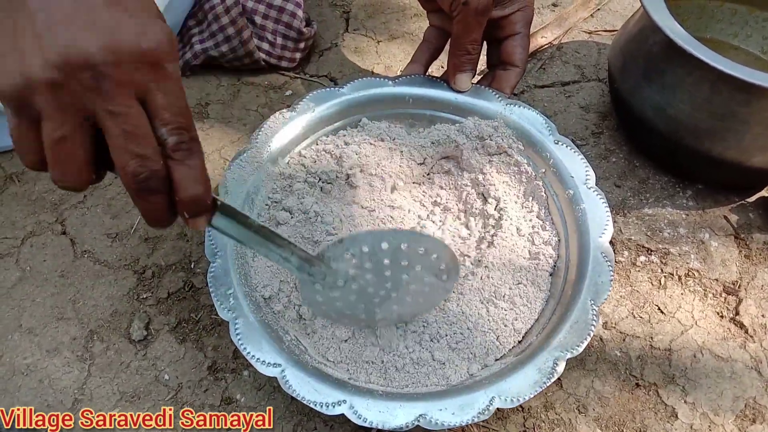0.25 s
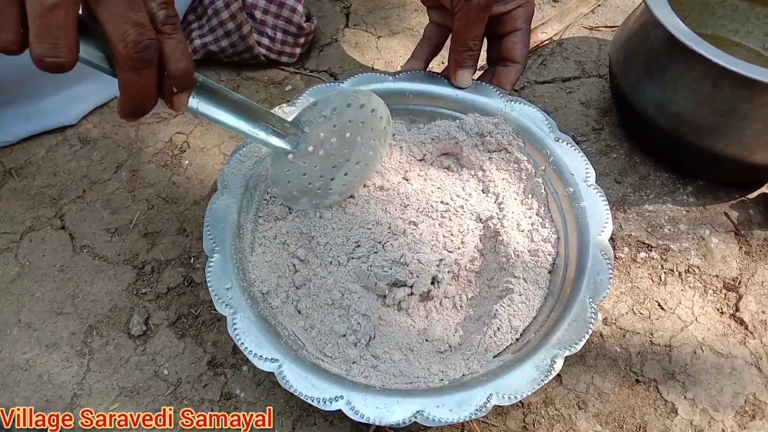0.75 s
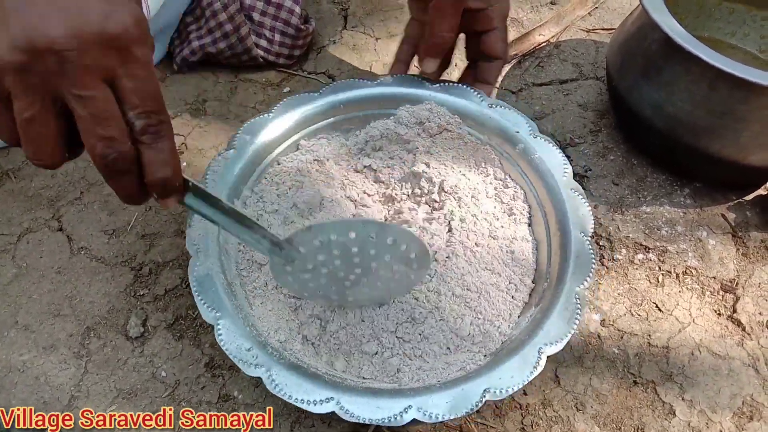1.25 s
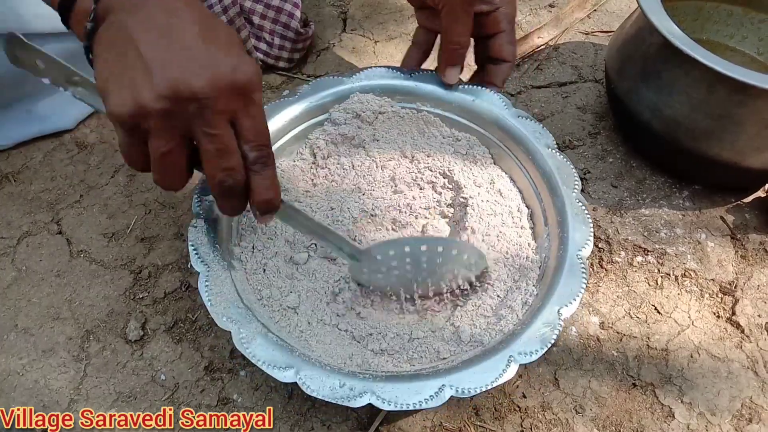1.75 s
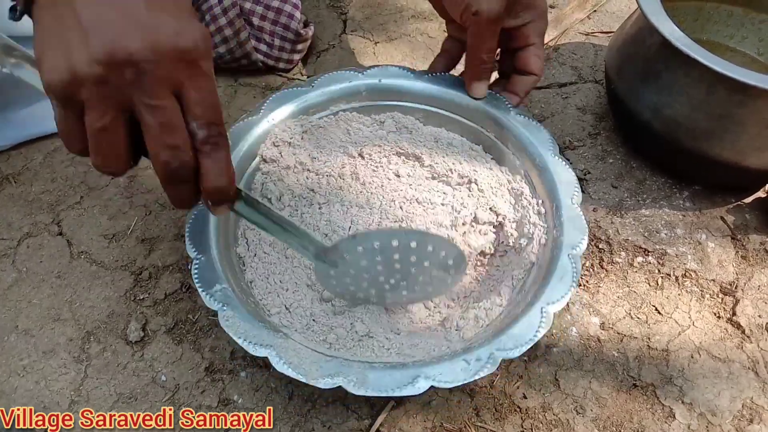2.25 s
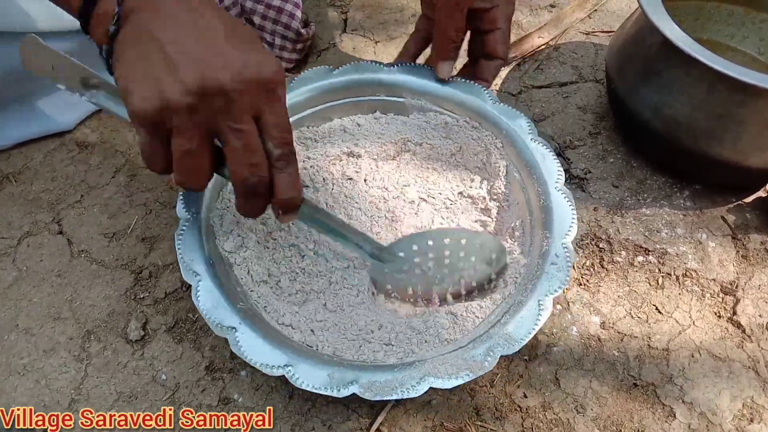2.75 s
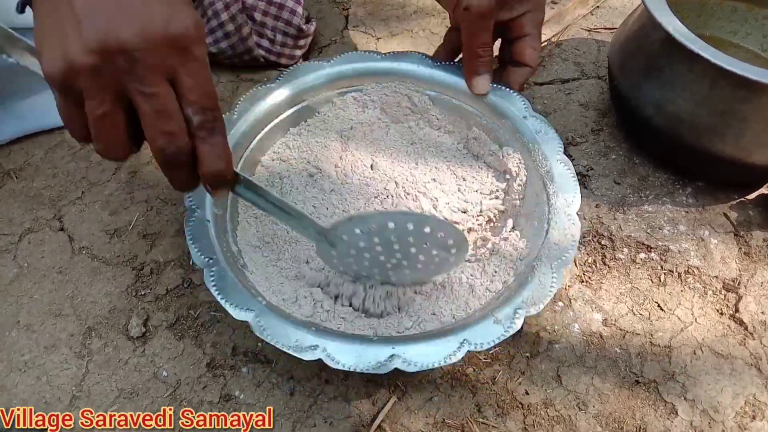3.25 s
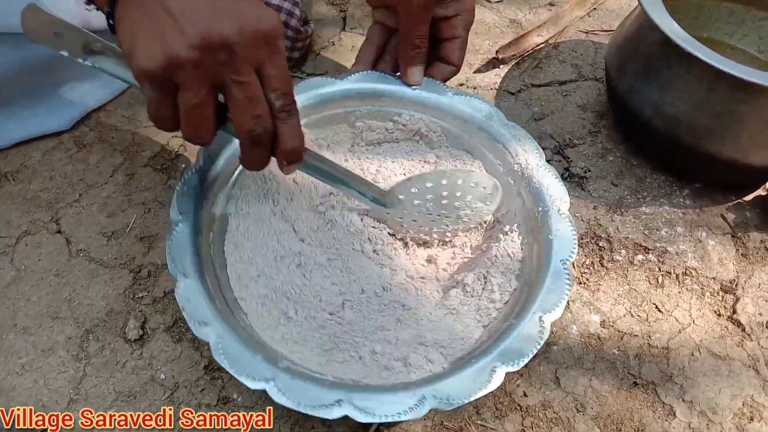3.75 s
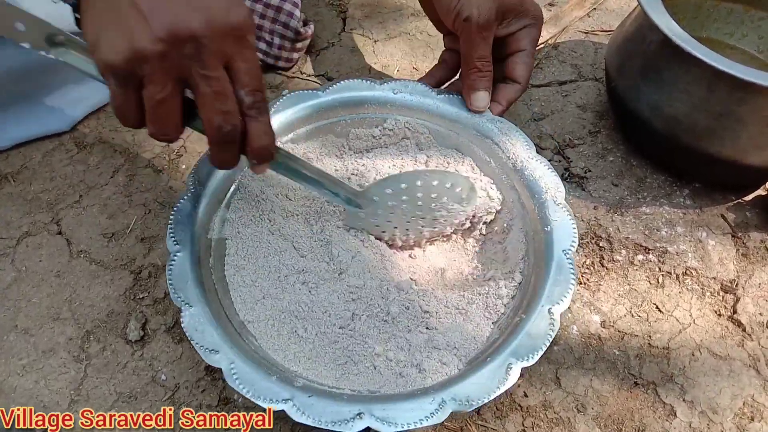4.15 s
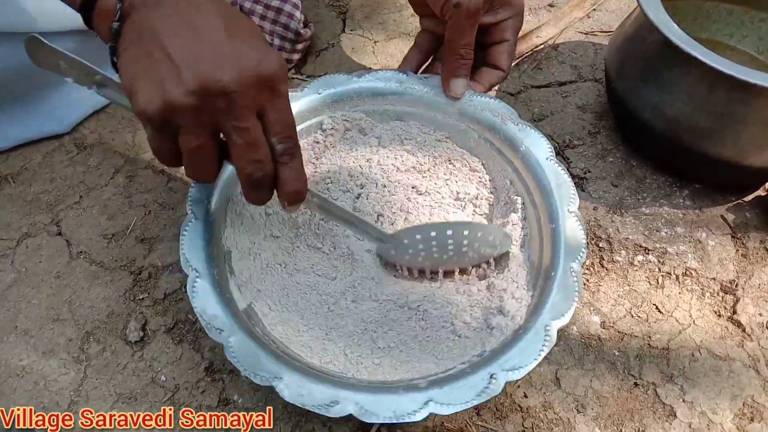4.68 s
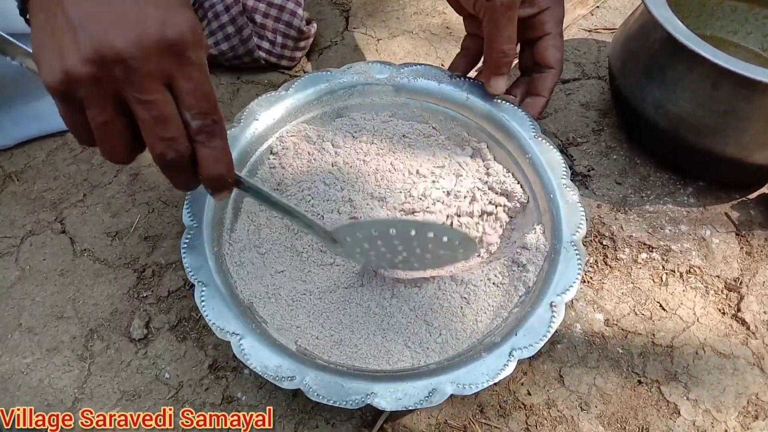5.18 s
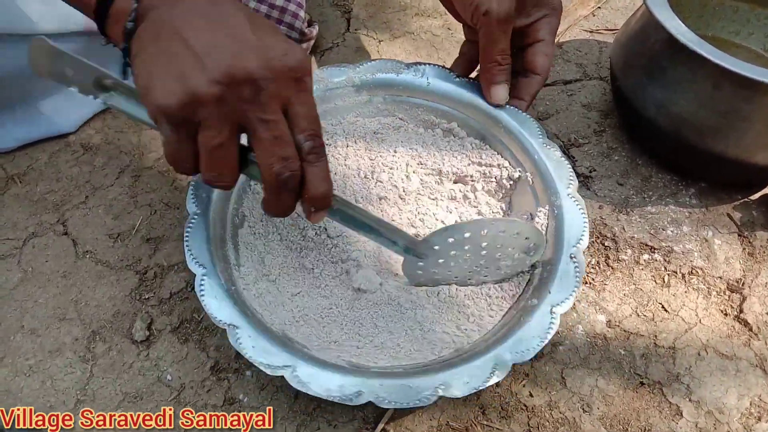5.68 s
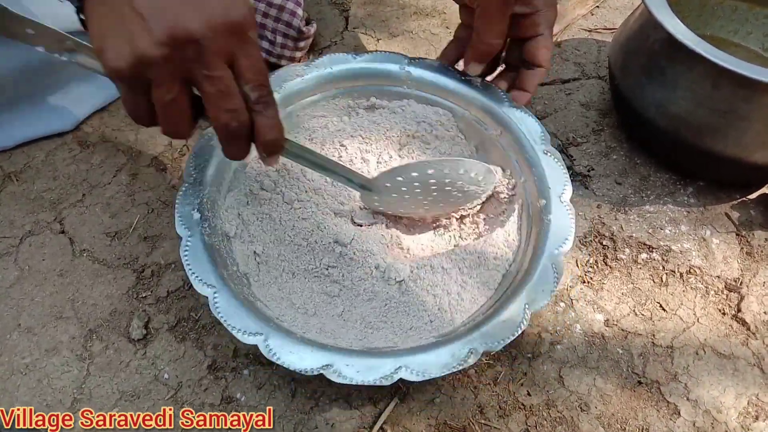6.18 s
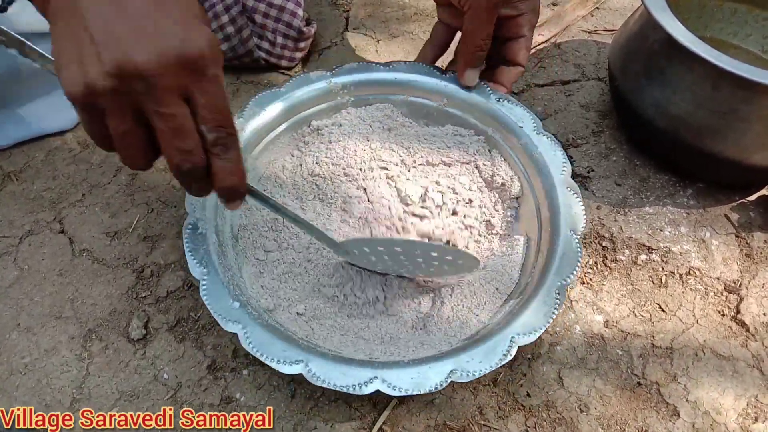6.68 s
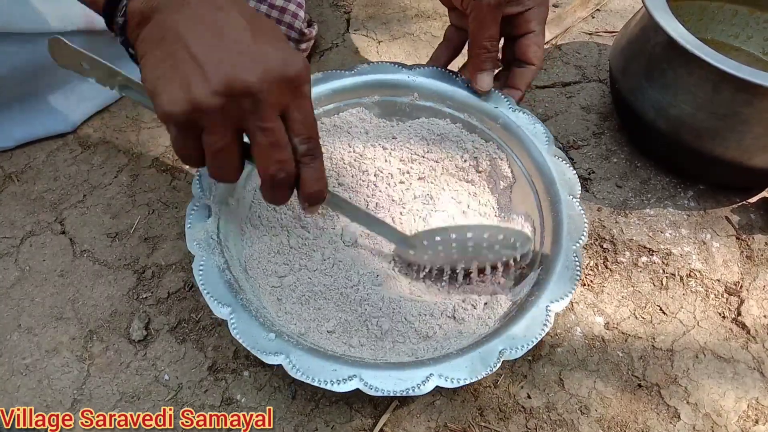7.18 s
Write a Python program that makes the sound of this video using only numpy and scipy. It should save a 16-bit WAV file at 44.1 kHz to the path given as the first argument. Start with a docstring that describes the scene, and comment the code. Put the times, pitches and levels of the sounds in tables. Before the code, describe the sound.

Outdoors on bare earth, a steel ladle stirs dry flour in a rocking metal plate: short gritty scrapes, muffled clinks and low thuds, irregular, several times a second in busy spots. Chicks peep shrilly without pause all around, each falling sharply in pitch with a short echo. A faint slow engine putters far away under murmuring air; a few soft bird whistles come late. One close microphone, identical in both channels.

```python
"""In a yard on bare earth, a perforated steel ladle stirs flour and grated coconut in a rocking steel plate.
The flour damps the metal: blows are short plate modes, sinking thuds and bright noise cracks,
and the scrapes between them are random grains, coloured as grit or ringing the plate.
Chicks peep all around as gliding sines that break and plunge, each with its own yard echo.
Farther off are a few whistling birds, a slow engine of filtered puffs, and murmuring open air."""
import sys
import numpy as np
from scipy import signal
from scipy.fft import rfft, irfft, next_fast_len
from scipy.io import wavfile
from scipy.ndimage import map_coordinates

SR = 44100
rng = np.random.default_rng(int(sys.argv[2]) if len(sys.argv) > 2 else 0)


def put_to_file(sound):
    """Save the sound as 16-bit audio at rate SR, in the file named by the first command-line argument."""
    columns = np.atleast_2d(sound).T  # one column per channel
    safe = np.clip(columns, -1, 1)
    whole_steps = np.round(safe * 32767)
    wavfile.write(sys.argv[1], SR, whole_steps.astype(np.int16))


N = 327221
TIME = np.arange(N) / SR


def amp(db):
    """Decibels to gain."""
    return 10 ** (np.asarray(db) / 20)


def unit(x):
    """Scale to rms 1."""
    return x / np.sqrt(np.mean(x ** 2) + 1e-20)


def add(track, s, x):
    """Mix x into the track from time s."""
    i = int(np.clip(round(s * SR), 0, N))
    track[i:i + len(x)] += x[:N - i]


def wobble(rate, size=N):
    """A smooth random curve, rate knots a second."""
    coarse = np.arange(0, size + 32, 32)
    knots = rng.standard_normal(size=1024)
    curve = map_coordinates(knots, [coarse * rate / SR], mode="mirror")
    return np.interp(np.arange(size), coarse, curve)


def filtered(x, response):
    """Multiply the spectrum of x by a response of frequency."""
    m = next_fast_len(len(x) + 8192)
    return irfft(rfft(x, m) * response(np.fft.rfftfreq(m, 1 / SR)), m)[:len(x)]


def coloured(x, spectrum):
    """Shape x by (frequency [Hz], level [dB]) points, at rms 1."""
    f, db = np.transpose(spectrum)
    return unit(filtered(x, lambda hz: amp(np.interp(np.log(hz + 1), np.log(f), db))))


def yard_echo(x, wet_db, t60, wall_db, count=5):
    """A call's own path through the yard: a few close reflections and a short diffuse tail."""
    t = np.arange(SR // 4) / SR
    tail = rng.standard_normal(len(t)) * amp(-60 * t / t60) * (1 - np.exp(-t / 0.0007))
    path = amp(wet_db) * tail / np.linalg.norm(tail)
    path[0] = 1  # the direct sound
    delays = rng.integers(SR // 500, SR // 45, count)
    path[delays] += amp(wall_db) * rng.choice([-1, 1], count)
    return signal.fftconvolve(x, path)


# spectrum of the yard's low murmur: (frequency [Hz], relative density [dB])
YARD_SPECTRUM = [(25, -34.5), (50, -4.5), (70, 1), (115, 3.5), (170, -3), (300, -20), (600, -28),
                 (1050, -25), (1450, -28), (1750, -20), (2100, -25.5), (2600, -21.5), (3500, -39)]
# spectrum of the high wash of air: (frequency [Hz], relative density [dB])
AIR_SPECTRUM = [(2000, -25), (4300, 7), (5800, 14.5), (7200, -29.5), (10000, -29.5), (13500, -24),
                (15200, -7), (16000, -62.5)]


def outdoors(yard_db=-59.5, air_db=-63, drone_hz=1255, drone_db=-70):
    """The low murmur of open air, a faint high wash, and a thin wavering drone of narrow noise from far off."""
    low = amp(yard_db + 0.33 * wobble(5.2)) * coloured(rng.standard_normal(N), YARD_SPECTRUM)
    high = amp(air_db + wobble(4.6)) * coloured(rng.standard_normal(N), AIR_SPECTRUM)
    narrow = lambda hz: np.exp(-((hz - drone_hz) / 65) ** 2)
    drone = unit(filtered(rng.standard_normal(N), narrow))
    return low + high + amp(drone_db + 4.5 * wobble(7)) * drone


# exhaust resonances: (centre [Hz], width [Hz], relative gain [dB])
EXHAUST_RESONANCES = [(66.5, 5.2, 1.5), (99.7, 19.4, 8.5), (124.7, 29, 6.5)]


def engine(firing_hz=16.12, level_db=-56, offset=0.4794):
    """A distant slow engine: each firing sends one impulse through the exhaust's resonances."""
    turns = np.cumsum(firing_hz * (1 + 0.0058 * wobble(1.586))) / SR + offset
    puffs = np.diff(np.floor(turns), prepend=0) * amp(wobble(20))

    def pipe(f):
        """Sum the resonances with alternating sign."""
        total = 0
        for k, (centre, width, db) in enumerate(EXHAUST_RESONANCES):
            damping = 1j * f * width
            total = total + (-1) ** k * amp(db) * damping / (centre ** 2 - f ** 2 + damping)
        return total

    distance = signal.butter(3, [55, 160], "bandpass", fs=SR, output="sos")
    return amp(level_db) * unit(signal.sosfilt(distance, filtered(puffs, pipe)))


# bird whistles: (start [s], length [s], first pitch [Hz], middle pitch [Hz], last pitch [Hz], relative level [dB])
BIRD_WHISTLES = [(5.28, .29, 3420, 3070, 2830, -50), (5.64, .15, 3250, 2900, 3020, -48),
                 (5.87, .12, 3500, 3150, 3480, -50), (5.76, .24, 1780, 1690, 1590, -58),
                 (6.26, .2, 1760, 1740, 1680, -61), (6.66, .21, 1770, 1740, 1640, -61)]


def far_birds(trim_db=-1, waver=0.016):
    """Soft sine whistles glide along a pitch curve, blurred by distant echo."""
    out = np.zeros(N)
    for s, length, first_hz, middle_hz, last_hz, db in BIRD_WHISTLES:
        u = np.linspace(0, 1, int(length * SR))
        glide = np.polyfit([0, .5, 1], [first_hz, middle_hz, last_hz], 2)
        hz = np.polyval(glide, u) * (1 + waver * wobble(150, len(u)))
        tone = np.sin(np.pi * u) * np.sin(2 * np.pi * np.cumsum(hz) / SR)
        add(out, s, yard_echo(amp(db + trim_db) * tone, wet_db=-3, t60=.3, wall_db=-14))
    return out


def peep(hold, fall, start_hz, break_hz, hold_db, fall_db, end_hz=2400, waver=0.007, flutter_db=4.5,
         octave_db=-24, fade_db=14, throat_hz=4230, throat_db=6.5):
    """A thin held whistle sags, breaks, and plunges as the beak opens; hold and fall are in seconds."""
    hold, fall = max(hold, .01), max(fall, .01)
    t = np.arange(int((hold + fall) * SR)) / SR
    held, fallen = np.clip(t / hold, 0, 1), np.clip((t - hold) / fall, 0, 1)  # progress through each part
    plunge = np.interp(fallen, [0, .14, .5, .75, 1], [0, .22, .47, .7, 1])
    hz = start_hz + (break_hz - start_hz) * held ** 2.4 + (end_hz - break_hz) * plunge
    # the pitch is steadier while held and grows rough in the fall
    hz = hz * (1 + waver * (0.65 + 3 * fallen) * wobble(297.0, len(t)))
    phase = 2 * np.pi * np.cumsum(hz) / SR
    opening = np.clip(fallen / 0.17, 0, 1)
    closing = np.clip(2 * fallen - 1, 0, 1)
    db = hold_db + (fall_db - hold_db) * opening - fade_db * closing
    # the fall flares as it sweeps through the resonance of throat and beak
    db = db + throat_db * opening * (np.exp(-((hz - throat_hz) / 330) ** 2) - .5)
    edges = np.clip(t / .028, 0, 1) * np.clip((hold + fall - t) / .004, 0, 1)
    level = amp(db + flutter_db * wobble(116.5, len(t))) * edges
    # the octave grows as it sinks out of the high treble
    octave = np.minimum(amp(octave_db - 70 * np.log2(hz / 4000)), .2)
    return level * (np.sin(phase) + octave * np.sin(2 * phase))


def brood(level_db=-51, middle_hz=5650, count=52):
    """The rest of the brood keeps up faint peeps, one in each equal slot of time, heavy with echo."""
    out = np.zeros(N)
    for k, (when, length, pitch, loud) in enumerate(rng.random((count, 4))):
        hz = middle_hz * 2 ** (.36 * (pitch - .5))
        db = level_db + 4 * (loud - .5)
        call = peep(0.12 + 0.068 * length, 0.045, hz, .88 * hz, db, db + 3)
        add(out, (k + when) / count * N / SR, yard_echo(call, wet_db=-1, t60=.3, wall_db=-14))
    return out


# every peep has one shape: a higher start sags further and falls for longer,
# and a louder fall follows a louder held note
TYPICAL_HZ, TYPICAL_DB = 5500, -36  # start pitch and relative level of a typical peep
BREAK_HZ, BREAK_FOLLOWS = 4963, 0.45  # typical pitch at the break; its exponent on the start pitch
FALL_S, FALL_FOLLOWS = .063, 0.514  # typical length of the fall; its exponent on the start pitch
HELD_DB, HELD_FOLLOWS = -39, 0.35  # typical relative level of the held note; its dB for each dB of the fall
# near chick peeps: (time of the break [s], held length [s], start pitch [Hz], relative level of the fall [dB])
CHICK_PEEPS = [(0.114, 0.11, 5930, -36), (0.271, 0.074, 5770, -46), (0.344, 0.044, 4750, -45),
               (0.452, 0.069, 5050, -43.5), (0.491, 0.11, 5924, -34), (0.572, 0.12, 4900, -38.5),
               (0.658, 0.047, 5660, -38.5), (0.704, 0.15, 4940, -53), (0.799, 0.12, 6060, -39),
               (0.891, 0.1, 5550, -27.5), (0.989, 0.069, 6010, -38), (1.261, 0.07, 4740, -37.5),
               (1.322, 0.15, 4970, -40), (1.325, 0.12, 6000, -30.5), (1.526, 0.059, 5700, -38.5),
               (1.648, 0.09, 4914, -41.5), (1.692, 0.066, 5350, -38), (1.793, 0.14, 5920, -31.5),
               (1.932, 0.11, 4910, -45), (2.053, 0.086, 4940, -39), (2.102, 0.085, 5965, -30.5),
               (2.252, 0.14, 5755, -39.5), (2.48, 0.083, 5990, -30.5), (2.725, 0.11, 4960, -44),
               (2.738, 0.091, 5720, -36.5), (2.856, 0.09, 6075, -30.5), (2.993, 0.054, 4910, -40),
               (3.155, 0.085, 5990, -26.5), (3.506, 0.11, 6035, -34), (3.521, 0.11, 5460, -32),
               (3.818, 0.13, 5070, -45.5), (3.93, 0.11, 6390, -32), (4.109, 0.034, 4870, -43.5),
               (4.166, 0.024, 5400, -39), (4.304, 0.11, 6244, -38.5), (4.319, 0.1, 5110, -35),
               (4.381, 0.15, 5120, -46.5), (4.554, 0.052, 5650, -48), (4.607, 0.089, 5370, -41),
               (4.63, 0.085, 6160, -32.5), (4.71, 0.1, 4995, -42.5), (4.848, 0.12, 5650, -44),
               (5.016, 0.12, 6050, -32.5), (5.055, 0.07, 5530, -39.5), (5.122, 0.043, 5210, -40),
               (5.19, 0.072, 4760, -36.5), (5.455, 0.099, 6380, -37.5), (5.502, 0.089, 5180, -42.5),
               (5.573, 0.036, 4910, -36), (5.66, 0.1, 5040, -42.5), (5.857, 0.092, 4840, -43.5),
               (6.096, 0.16, 4840, -62), (6.207, 0.049, 5030, -37.5), (6.238, 0.069, 5690, -36),
               (6.435, 0.11, 5650, -43), (6.529, 0.097, 6100, -32.5), (6.672, 0.041, 5460, -37),
               (6.924, 0.096, 5700, -32), (7.094, 0.061, 6050, -41.5), (7.16, 0.055, 5230, -37.5),
               (7.251, 0.09, 5850, -29.5), (7.392, 0.067, 5600, -44)]


def chicks(trim_db=1.0, fall_scatter=0.06):
    """Near peeps, each with its own random reflections in the yard and a slightly varied fall."""
    out = np.zeros(N)
    for (break_s, hold, hz, db), chance in zip(CHICK_PEEPS, rng.standard_normal(len(CHICK_PEEPS))):
        high = hz / TYPICAL_HZ
        fall = FALL_S * high ** FALL_FOLLOWS * np.exp(fall_scatter * chance)
        held_db = HELD_DB + HELD_FOLLOWS * (db - TYPICAL_DB)
        call = peep(hold, fall, hz, BREAK_HZ * high ** BREAK_FOLLOWS, held_db, db)
        add(out, break_s - hold, yard_echo(call, wet_db=-6.5, t60=0.25, wall_db=-10.0))
    return amp(trim_db) * out


# squeaks of packed flour: (start [s], length [s], rms level before the fades [dB])
FLOUR_SQUEAKS = [(0.924, 0.033, -34.5), (1.244, 0.02, -35.5)]


def squeaks(hz=1215, waver=0.041, flutter_db=10.0, edge_s=0.0044):
    """The ladle sticks and slips in packed flour: a short tone, rough in pitch and level."""
    out = np.zeros(N)
    for s, length, db in FLOUR_SQUEAKS:
        t = np.arange(int(length * SR)) / SR
        phase = 2 * np.pi * np.cumsum(hz * (1 + waver * wobble(474, len(t)))) / SR
        tone = unit(np.sin(phase) * amp(flutter_db * wobble(350, len(t))))
        gate = np.clip(np.minimum(t, length - t) / edge_s, 0, 1)
        add(out, s, tone * gate * amp(db))
    return out


# modes of the flour-damped plate: (nominal pitch [Hz], relative level [dB], time to fall 60 dB [s])
PLATE_MODES = [(364, 0.5, 0.0094), (596, -18.5, 0.018), (886.7, -6, 0.037), (993, -0.5, 0.017),
               (1251.5, -1, 0.048), (1420, -4.5, 0.031), (1585, 1, 0.017), (1847, -3, 0.013),
               (2320, -6, 0.015), (3190, -28.5, 0.004)]


def plate_ring(floor_db, vary_db):
    """The plate's answer to one impulse: damped modes, with floor_db on the low modes of its floor."""
    t = np.arange(SR // 12) / SR
    hz, mode_db, t60 = np.transpose(PLATE_MODES)[:, :, None]
    strength, shift, turn = rng.standard_normal((3, len(PLATE_MODES), 1))
    db = mode_db + floor_db * (hz < 1100) + vary_db * strength
    phase = 2 * np.pi * (hz * (1 + .02 * shift) * t + turn)
    modes = amp(db - 60 * t / t60) * np.sin(phase)
    return modes.sum(0) * (1 - np.exp(-t / .0003))


BITE_SHARE, EASE_SHARE = 0.43, 0.52  # time scales of digging in and easing off, as shares of the length
STROKE_SHAPE = 1.98  # roundness of the swell
DRAG_EDGE_DB, DRAG_PRESS_DB = -77.5, -67  # light drag between strokes, relative
# strokes of the ladle: (deepest bite [s], length [s], relative level of the edge scraping on steel [dB],
# relative level of the ladle pressing through the flour [dB])
LADLE_STROKES = [(0.481, 0.07, -77, -54.5), (0.935, 0.077, -59, -43.5), (1.221, 0.095, -71, -49),
                 (1.388, 0.15, -76, -53.5), (1.61, 0.35, -60.5, -59.5), (2.06, 0.26, -58, -56),
                 (2.41, 0.27, -56.5, -56), (2.74, 0.15, -58.5, -60), (3.019, 0.088, -52.5, -50),
                 (3.144, 0.18, -59.5, -54), (3.405, 0.11, -53, -51), (3.746, 0.18, -53, -49.5),
                 (4.218, 0.22, -52.5, -56), (4.389, 0.025, -64.5, -45.5), (4.664, 0.32, -56, -58.5),
                 (5.055, 0.23, -60, -58.5), (5.406, 0.12, -59.5, -52.5), (5.695, 0.039, -48, -44),
                 (5.75, 0.19, -59, -53), (6.119, 0.1, -53.5, -49.5), (6.447, 0.05, -66, -44.5),
                 (6.683, 0.14, -74, -59), (7.156, 0.054, -50, -47.5), (7.41, 0.065, -55.5, -58)]


def stroke_levels():
    """Gains of scrape and pressure: each stroke swells to its deepest bite and eases off."""
    edge, press = np.full(N, amp(DRAG_EDGE_DB)), np.full(N, amp(DRAG_PRESS_DB))
    for s, length, edge_db, press_db in LADLE_STROKES:
        side = length * np.where(TIME < s, BITE_SHARE, EASE_SHARE)
        distance = np.minimum(np.abs((TIME - s) / side), 2 * np.pi)
        swell = np.exp(-distance ** STROKE_SHAPE)
        edge = np.maximum(edge, amp(edge_db) * swell)
        press = np.maximum(press, amp(press_db) * swell)
    return edge, press


def grains(rate, spread_db, smooth):
    """Tiny slips of random size, rate a second on average, over an even rub."""
    hit = rng.random(N) < rate / SR
    size = np.minimum(rng.exponential(size=N), 4)
    slips = unit(hit * amp(spread_db * size) * rng.choice([-1, 1], N))
    return slips + smooth * rng.standard_normal(N)


# spectrum of grit and of steel on steel: (frequency [Hz], relative density [dB])
GRIT_SPECTRUM = [(300, -60), (1000, -10), (2500, -12.5), (3800, -8), (5200, 9.5), (6300, 8), (7400, -6.5),
                 (9500, -11), (12500, -24.5), (13700, -24.5), (14500, -9), (15300, -8.5), (16000, -86)]


def stirring(edge_gain_db=14, press_gain_db=-1, judder_db=2, lumps_db=1.54):
    """Grit crackles under the edge while the pressure of the stroke drives the plate's modes."""
    edge, press = stroke_levels()
    judder = judder_db * wobble(60) + lumps_db * wobble(22)
    grit = coloured(grains(rate=2600, spread_db=4.3, smooth=0.6), GRIT_SPECTRUM)
    plate = plate_ring(floor_db=-3, vary_db=0)
    body = unit(signal.fftconvolve(grains(rate=900, spread_db=4, smooth=1.0), plate)[:N])
    return edge * amp(edge_gain_db + judder) * grit + press * amp(press_gain_db + judder) * body


CRACK_DB = -11.5  # each blow's bright crack, against its ring in the table
# light ticks of the ladle's edge on bare steel: (start [s], relative level [dB])
EDGE_TICKS = [(1.954, -34.5), (2.248, -38.5), (2.3601, -29.5), (2.47, -37.5), (2.608, -36), (2.7799, -32.5),
              (3.706, -26.5), (3.7403, -26.5), (4.0507, -32.5), (4.1151, -32.5), (4.612, -43),
              (4.8272, -32.5), (5.3038, -38)]
# the ladle strikes the plate and bumps it on the ground: (start [s], relative ring level [dB],
# relative thud level [dB], relative boost of the floor modes under 1.1 kHz [dB])
LADLE_BLOWS = [(0.402, -31.5, -28.5, -2), (0.902, -36, -36.5, 1), (1.1255, -20, -18, -1),
               (1.181, -43, -31.5, -6), (1.367, -66, -31.5, -14), (1.732, -30.5, -22.5, -5.5),
               (2.05, -33, -37, -12), (2.102, -28, -23, -5), (2.368, -36, -25.5, -1),
               (2.726, -36.5, -35, 3), (3.003, -25.5, -37, 0), (3.1, -38.5, -20, 5), (3.115, -21, -16.5, 4),
               (3.168, -30.5, -49, -6), (3.219, -26, -56, -3.5), (3.362, -28.5, -33.5, 0),
               (3.673, -17, -31, -3), (3.788, -27.5, -11.5, -4), (4.041, -34, -28, -3),
               (4.3502, -18, -18, -21), (5.681, -20, -32.5, -8), (5.691, -24.5, -49, 20),
               (5.786, -32.5, -18, 11), (6.087, -34.5, -43, -8), (6.404, -31.5, -29.5, 1),
               (6.541, -34, -37, 2.5), (6.81, -31, -64, -12.5), (6.826, -34, -47.5, -23),
               (7.136, -30, -42, -11), (7.192, -51, -23.5, -11)]


def ticks(trim_db=6, tail_db=-21):
    """Steel on steel, in light ticks and in every blow: a sharp noise crack with a short bright tail."""
    out, t = np.zeros(N), np.arange(SR // 10) / SR
    blow_cracks = [(s, ring_db + CRACK_DB) for s, ring_db, *_ in LADLE_BLOWS]
    for s, db in list(EDGE_TICKS) + blow_cracks:
        crack = amp(-60 * t / .014) * (1 - np.exp(-t / .0003))
        decay = crack + amp(tail_db - 60 * t / 0.18)
        add(out, s, amp(db + trim_db) * decay * coloured(rng.standard_normal(len(t)), GRIT_SPECTRUM))
    return out


# the more a blow rings against its thud, the higher its thud, up to a ceiling (pitch before the sag)
SOFT_THUD_HZ, HARD_RISE_HZ, HARD_POWER, HARDEST_HZ = 132.6, 78.3, 0.678, 385
# spectrum of the settling rumble: (frequency [Hz], relative density [dB])
SETTLE_SPECTRUM = [(50, -55), (110, 12.5), (220, 15), (400, -2.5), (900, -24), (2000, -72)]


def thuds(trim_db=2, rise=0.0024, t60=0.023, sag=0.59, settle_db=-19, delay=0.001):
    """The plate hits the earth: a short push of sinking pitch and a faint, longer settling rumble."""
    out, t = np.zeros(N), np.arange(SR // 8) / SR
    for s, ring_db, db, _ in LADLE_BLOWS:
        hz = min(SOFT_THUD_HZ + HARD_RISE_HZ * amp(ring_db - db) ** HARD_POWER, HARDEST_HZ)
        phase = 2 * np.pi * np.cumsum(hz * (0.671 + sag * np.exp(-t / 0.0096))) / SR
        push = np.sin(phase) * (1 - np.exp(-(t / rise) ** 2)) * amp(-60 * t / t60)
        settle = coloured(rng.standard_normal(len(t)), SETTLE_SPECTRUM)
        settle *= amp(settle_db - 60 * t / 0.15) * (1 - np.exp(-t / 0.0039))
        add(out, s + delay, amp(db + trim_db) * (push / np.abs(push).max() + settle))
    return out


def knocks(floor_lift_db=9, chatter_db=-29, chatter_t60=0.083, delay=0.00153):
    """A blow's impulse and the ladle's brief noisy chatter after it ring the plate."""
    out, t = np.zeros(N), np.arange(SR // 12) / SR
    for s, db, _, floor_db in LADLE_BLOWS:
        force = rng.standard_normal(len(t)) * amp(chatter_db - 60 * t / chatter_t60)
        force[0] = 1
        blow = signal.fftconvolve(force, plate_ring(floor_db + floor_lift_db, vary_db=3))
        add(out, s + delay, amp(db) * blow / np.abs(blow).max())
    return out


def scene():
    """Everything reaches one microphone, the same in both channels."""
    background = outdoors() + engine() + far_birds() + brood() + chicks()
    ladle = squeaks() + stirring() + ticks() + thuds() + knocks()
    mono = background + ladle
    return np.array([mono, mono])


def record(dry, low_cut_hz=62, top_hz=15800):
    """The microphone sheds deep bass, and nothing passes above the band limit."""
    low_cut = signal.butter(3, low_cut_hz, "highpass", fs=SR, output="sos")
    thin = signal.sosfilt(low_cut, dry)
    return np.array([filtered(channel, lambda hz: hz < top_hz) for channel in thin])


dry = scene()
out = record(dry)
put_to_file(out)
```